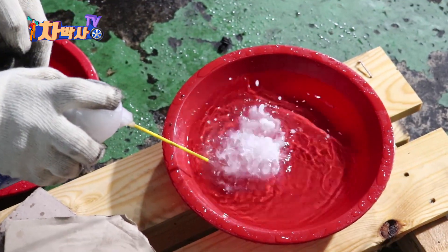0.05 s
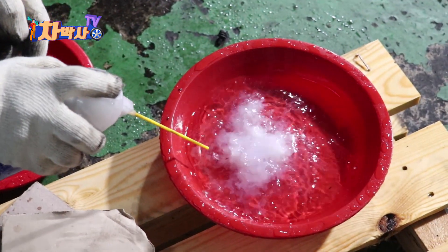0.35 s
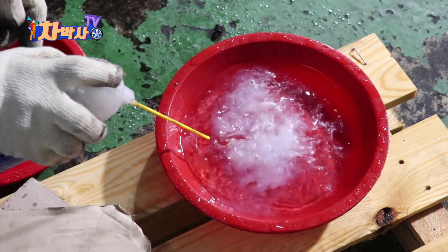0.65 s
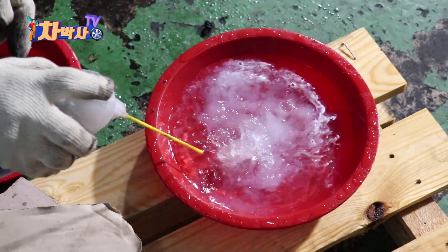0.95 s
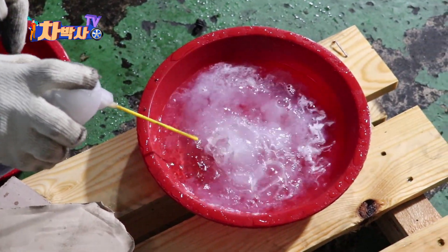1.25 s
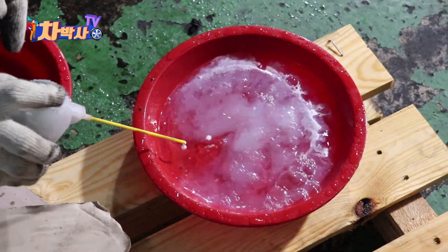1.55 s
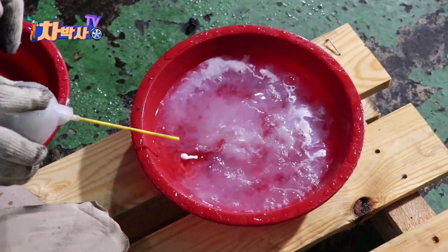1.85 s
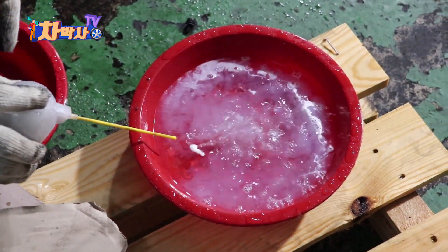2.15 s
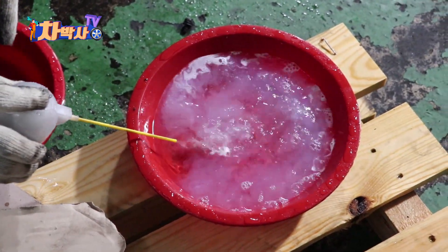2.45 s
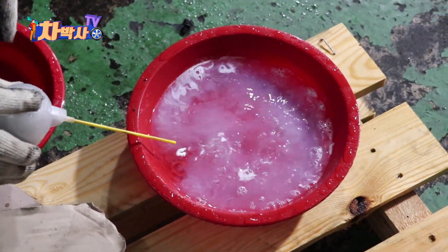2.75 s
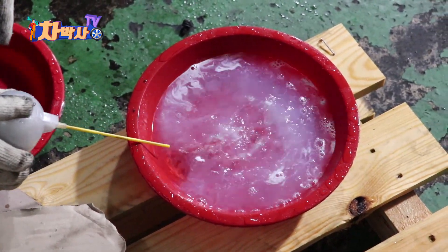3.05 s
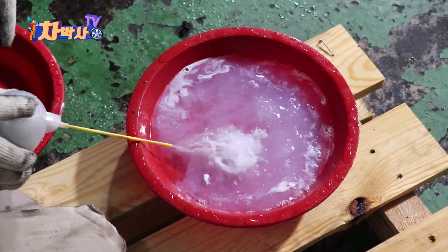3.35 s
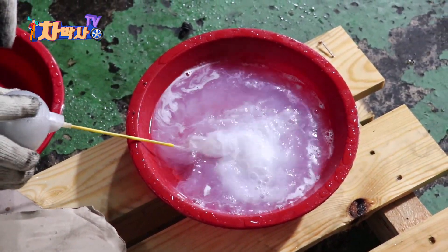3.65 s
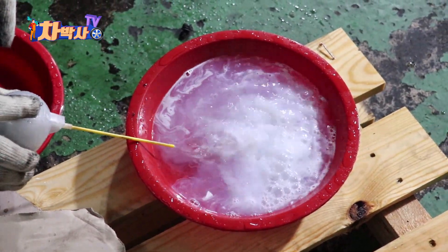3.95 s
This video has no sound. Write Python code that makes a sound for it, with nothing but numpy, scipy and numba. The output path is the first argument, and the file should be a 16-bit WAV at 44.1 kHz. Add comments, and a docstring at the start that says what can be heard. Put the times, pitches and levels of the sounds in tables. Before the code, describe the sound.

A jet of liquid and air hisses into a basin of water, foaming and gurgling, with wet spits and chirping drops thickest from 0.9 to 1.3 seconds. It fades near 1.5 seconds, then the nozzle sputters at 1.7 and the spray resumes. After another lull around 2.7 to 2.9, it fizzes on until 4 seconds, ending with deeper glugs. Distant machinery hums steadily outdoors.

```python
"""A jet of liquid and air, blown from a squeeze bottle through a thin tube, hisses into a plastic basin
of water outdoors. It foams and tears off small ringing bubbles; where it digs in, a pocket of air
gurgles at a pitch that follows its size, among wet spits and glugs. Drops chirp, the spray sizzles
and the nozzle sputters once. Distant machinery hums and rushes. One microphone with gain control."""
import sys
import numpy as np
from scipy import signal
from scipy.io import wavfile
from scipy.ndimage import uniform_filter1d
from numba import njit

SR = 44100
rng = np.random.default_rng(int(sys.argv[2]) if len(sys.argv) > 2 else 0)


def to_wav(s):
    """Save 16-bit WAV."""
    ch = np.atleast_2d(s).T  # columns
    pcm = np.round(np.clip(ch, -1, 1) * 32767)  # PCM
    wavfile.write(sys.argv[1], SR, pcm.astype(np.int16))


N = 176400

# Small bubbles torn off by the jet and by the air pockets.
SMALL_BUBBLES = dict(centre_hz=2690, spread_ratio=1.436, per_s=1300, ring_cycles=34)


def from_db(db):
    """Decibels to gain."""
    return 10 ** (np.asarray(db) / 20)


def rms_one(x):
    """Scale to unit rms."""
    return x / np.sqrt(np.mean(x ** 2) + 1e-20)


def in_time(rows):
    """Join timed rows by straight lines: one curve for each column after the time."""
    times, *columns = np.transpose(rows)
    return [np.interp(np.arange(N) / SR, times, column) for column in columns]


def drift(corner_hz):
    """A smooth random wander with rms about 1."""
    step, settle = 20, 4000
    pole = np.exp(-2 * np.pi * corner_hz * step / SR)
    white = rng.standard_normal(N // step + settle + 2)
    slow = signal.lfilter([1], [1, -2 * pole, pole * pole], white)[settle:]
    return np.interp(np.arange(N) / step, np.arange(len(slow)), rms_one(slow))


def banded_noise(spectrum):
    """Third-octave bands of noise shaped to a spectrum; rms 1."""
    edges = 22 * 2 ** (np.arange(30) / 3)
    white = rng.standard_normal((2, N))
    hz, db = np.transpose(spectrum)
    out = 0
    for k, (low, high) in enumerate(zip(edges, edges[1:])):
        band = signal.sosfilt(signal.butter(2, [low, high], "band", fs=SR, output="sos"), white[k % 2])
        out += band * from_db(np.interp(np.log(low * high) / 2, np.log(hz), db))
    return rms_one(out)


@njit
def glide(drive, hz, q):
    """A resonance with a moving centre; returns its complex swing."""
    out, swing = np.zeros(len(drive), np.complex128), 0j
    for i in range(len(drive)):
        w = 2 * np.pi * hz[i] / SR
        swing = swing * np.exp(-w / (2 * q) + 1j * w) + w * drive[i]
        out[i] = swing
    return out


def cavity(hz, q, even_s=0.023):
    """Turbulence rings an air cavity; the level is evened to rms 1."""
    swing = glide(rng.standard_normal(len(hz)), hz, float(q))
    power = uniform_filter1d(abs(swing) ** 2, int(even_s * SR))
    return swing.real / np.sqrt(power / 2 + 1e-12)


def burst(peak_s, db, hz, width_s, q, fall_octaves):
    """A resonance swells and dies in a bell curve, falling by fall_octaves every width_s."""
    age = (np.arange(N) / SR - peak_s) / width_s
    on, out = abs(age) < 4, np.zeros(N)
    ring = cavity(hz * 2 ** (-fall_octaves * age[on]), q)
    out[on] = from_db(db) * ring * np.exp(-age[on] ** 2 / 2)
    return out


def bubbles(centre_hz, spread_ratio, per_s, ring_cycles, pitches=20, spread_db=2.5):
    """Bubbles of random size, each ringing at its own pitch and fading 60 dB in ring_cycles; rms 1."""
    strength = from_db(spread_db * np.minimum(rng.exponential(1, N), 5)) * rng.choice([-1, 1], N)
    clicks = strength * (rng.random(N) < per_s / SR)
    pitch_index = rng.integers(0, pitches, N)
    out = 0
    for k, hz in enumerate(np.geomspace(centre_hz / spread_ratio, centre_hz * spread_ratio, pitches)):
        pole = np.exp(-np.log(1000) * hz / (ring_cycles * SR))
        resonator = [1, -2 * pole * np.cos(2 * np.pi * hz / SR), pole * pole]
        out += signal.lfilter([1, 0, -1], resonator, clicks * (pitch_index == k) + 1e-18)
    return rms_one(out)


def jet(top_hz=11500, tilt_db_per_db=0.2):
    """Hiss, foam fizz and small bubbles all grow with the flow; a strong jet is brighter."""
    # The strength of the jet. Each row: time in seconds, level in dB.
    flow = [(0, -27), (.16, -27.5), (.34, -37), (.56, -26.5), (.84, -29.5), (.95, -35), (1.0, -25),
            (1.23, -22), (1.33, -21), (1.4, -33.5), (1.435, -30), (1.49, -49), (1.74, -44), (1.8, -28),
            (2.04, -29.5), (2.09, -23.5), (2.14, -26.5), (2.28, -26.5), (2.52, -26.5), (2.66, -35),
            (2.69, -44), (2.91, -47), (2.93, -32), (3.01, -25.5), (3.19, -27.5), (3.22, -34.5),
            (3.36, -26.5), (3.84, -26.5), (4.0, -23)]
    # The colour of the hiss. Each row: frequency in Hz, relative noise density in dB.
    hiss_spectrum = [(900, -25), (2000, -16), (4000, 5.5), (6500, 0), (8500, 0.5), (11000, 3.5),
                     (13000, 3.1), (16000, -1.6)]
    # How much the jet foams. Each row: time in seconds, fizz level in dB relative to the flow.
    foam = [(0, -8.5), (1.1, -1.5), (1.9, -8.5), (2.15, -1), (2.9, -3), (3.6, -0.5), (4, -2)]
    flow_db, = in_time(flow)
    flutter = from_db(1.5 * drift(corner_hz=36))
    air = banded_noise(hiss_spectrum)
    top = signal.sosfiltfilt(signal.butter(2, top_hz, "high", fs=SR, output="sos"), air)
    top_gain = from_db(tilt_db_per_db * (flow_db - np.median(flow_db)))
    hiss = from_db(-0.46) * (air + top * (top_gain - 1))
    foam_db, = in_time(foam)
    fizz = from_db(foam_db) * bubbles(centre_hz=5400, spread_ratio=1.085, per_s=1700, ring_cycles=62)
    bubbling = from_db(-4.5) * bubbles(**SMALL_BUBBLES)
    return flutter * from_db(flow_db) * (hiss + fizz + bubbling)


def gulps(scatter_octaves, typical_per_s=90, fall_octaves=.15, spread_db=2.5, count=1000):
    """An uneven chain of short swells, each falling in pitch; returns pitch ratio and gain."""
    gap, pitch, level = rng.standard_normal((count, 3)).T
    starts = np.cumsum(np.exp(gap / 2)) / typical_per_s
    place = np.interp(np.arange(N) / SR, starts - starts[0], np.arange(count))
    k, age = place.astype(int), place % 1
    swell = np.sqrt(np.sin(np.pi * age)) * from_db(spread_db * np.clip(level[k], -2, 2))
    bend = 2 ** (scatter_octaves * pitch[k] - fall_octaves * (age - .5))
    return bend, rms_one(swell)


def droplets(hz=3796):
    """Droplets over the gurgles: three overlapping chains of tiny falling chirps; rms 1."""
    chains = [gulps(scatter_octaves=0.272, typical_per_s=115, fall_octaves=0.3, spread_db=6.5)
              for _ in range(3)]
    return rms_one(sum(swell * cavity(hz * bend, q=54) for bend, swell in chains))


def gurgles(pocket_q=16, side_db=-6):
    """Each air pocket rings as it refills in gulps, and sheds side pockets, droplets and bubbles."""
    # Air pockets under the jet. Each entry: pitch scatter in octaves, then the pocket's path.
    # Each row of a path: time in seconds, resonance in Hz, level in dB.
    pockets = [ (0.11, [(0, 1370, -20.5), (.082, 1415, -18.5), (.115, 1570, -19.5), (.135, 1390, -20),
               (.2, 1380, -25.5)]), (.05, [(.505, 3530, -40), (.525, 2860, -22), (.55, 2400, -24),
               (.585, 2620, -28), (.612, 1860, -18), (.635, 1900, -26)]), (0.37, [(.635, 2320, -22.5),
               (.69, 2120, -22), (.78, 2730, -22), (.83, 2520, -25.5)]), (0.11, [(.83, 2330, -21),
               (.85, 2220, -20.5), (.88, 2040, -20), (.935, 2040, -17.5), (.95, 1660, -16.5),
               (.99, 1480, -20), (1.005, 1280, -15), (1.04, 1890, -16), (1.09, 1750, -22.5),
               (1.13, 1340, -20.5), (1.21, 1680, -17), (1.25, 1400, -30)]), (.03, [(1.265, 945, -26.5),
               (1.3, 707, -21.5), (1.325, 866, -17), (1.35, 930, -23.5), (1.375, 1140, -19.5),
               (1.42, 1220, -27)]), (.03, [(2.11, 3000, -22), (2.143, 2160, -17), (2.172, 2380, -20),
               (2.195, 1950, -19), (2.225, 2080, -30)]), (.05, [(2.23, 3500, -27), (2.25, 3250, -20),
               (2.29, 3200, -27), (2.36, 3300, -30), (2.38, 3250, -21.5), (2.455, 3030, -22.5),
               (2.49, 2370, -24.5), (2.52, 2620, -39)]), (0.1, [(2.955, 3900, -43), (2.98, 2990, -18.5),
               (3.0, 2900, -37), (3.035, 3120, -20.5), (3.07, 3550, -34.5), (3.165, 3300, -27),
               (3.22, 3440, -32)]), (0.056, [(3.62, 1320, -32), (3.655, 1220, -25), (3.72, 900, -28.5),
               (3.76, 742, -23.5), (3.825, 905, -24), (3.845, 950, -40)]), (0.11, [(3.85, 1600, -28),
               (3.875, 1160, -22), (3.91, 1740, -23), (3.93, 1390, -29), (3.948, 1420, -17),
               (3.962, 1700, -31), (3.98, 2220, -17.5), (4.0, 2050, -16)])]
    t, out = np.arange(N) / SR, np.zeros(N)
    side_bend, side_swell = gulps(scatter_octaves=.28)
    splash = from_db(-8.5) * droplets() + from_db(-10.5) * bubbles(**SMALL_BUBBLES)
    for scatter_octaves, path in pockets:
        on = (t >= path[0][0]) & (t <= path[-1][0])
        hz, db = in_time(path)
        bend, swell = gulps(scatter_octaves)
        main = swell[on] * cavity((hz * bend)[on], pocket_q)
        side = from_db(side_db) * side_swell[on] * cavity((hz * side_bend)[on], pocket_q)
        out[on] += from_db(db[on]) * (main + side + splash[on])
    return out


def machinery(rush_db=-24.5, drone_hz=72.8, waver_hz=0.5, waver_db=1.0):
    """Distant machinery: a steady rush with wavering hum tones and a low, swelling drone."""
    # The colour of the rush. Each row: frequency in Hz, relative noise density in dB.
    rush_spectrum = [(25, -8.5), (60, -7.5), (110, -10.5), (190, -8), (290, -4), (500, -4), (700, -4),
                     (850, 2), (1020, -3.5), (1250, 0.5), (1800, -6), (3600, -6), (4600, -18),
                     (5600, -11.5), (7500, -27.5), (10000, -32), (15500, -48)]
    # The tones of the hum. Each row: pitch in Hz, level in dB.
    hum_tones = [(145, -46), (240, -36), (298, -44.5), (360.6, -50), (435.2, -37), (581, -47)]
    # The swell of the drone. Each row: time in seconds, level in dB.
    drone_swell = [(0, -45), (1.5, -47.5), (2.4, -38.5), (3.0, -48.5), (3.45, -35.5), (4, -40.5)]
    drone_db, = in_time(drone_swell)
    out = from_db(rush_db) * banded_noise(rush_spectrum)
    for hz, db in [*hum_tones, (drone_hz, drone_db)]:
        turns = rng.random() + np.cumsum(hz + waver_hz * drift(corner_hz=3.2)) / SR
        gain = from_db(db + waver_db * drift(corner_hz=15))
        out += gain * np.sqrt(2) * np.sin(2 * np.pi * turns)
    return out


def spits(lift_db=2.5):
    """Short wet spits and glugs, each a broad resonance that falls in pitch."""
    # The spits and glugs. Each row: peak time in seconds, level in dB before the lift, pitch in Hz,
    # width in seconds.
    wet_bursts = [(0.079, -20, 3300, 0.005), (0.136, -19, 3300, 0.0086), (0.522, -20.5, 2750, 0.0083),
                  (0.565, -25.5, 5800, 0.0047), (0.591, -19.5, 2550, .005), (.609, -17.5, 1930, .008),
                  (0.733, -16, 3900, 0.0024), (0.797, -19, 2710, 0.0015), (0.943, -7.5, 1890, 0.002),
                  (0.944, -28, 5170, 0.0016), (1.236, -18, 5300, 0.012), (1.335, -17.5, 3200, 0.003),
                  (1.381, -24.5, 5400, 0.0077), (2.094, -26, 5400, .008), (2.113, -15, 2850, 0.0024),
                  (2.539, -16.5, 2900, 0.0082), (3.347, -20.5, 2800, 0.0014), (3.731, -22, 2280, 0.0062),
                  (3.904, -18.5, 2420, .003)]
    return sum(burst(peak_s, db + lift_db, hz, width_s, q=9, fall_octaves=.14)
               for peak_s, db, hz, width_s in wet_bursts)


def drops():
    """Single loud drops, each a wet chirp that slides quickly down."""
    # The drops. Each row: peak time in seconds, pitch in Hz, level in dB.
    plinks = [(.888, 3540, -28), (.911, 3450, -24), (1.068, 4100, -19), (1.146, 3560, -17),
              (1.166, 3900, -14.5), (1.194, 5700, -21), (1.198, 3520, -10.5), (1.338, 2130, -15),
              (2.279, 5200, -20), (2.421, 3140, -14), (3.437, 3480, -17.5), (3.954, 3400, -13.5),
              (3.978, 5250, -15)]
    return sum(burst(peak_s, db, hz, width_s=.005, q=13, fall_octaves=.12) for peak_s, hz, db in plinks)


def sizzles():
    """The spray sings for a moment in one high band."""
    # Resonances of the spray. Each row: peak time in seconds, level in dB, pitch in Hz,
    # width in seconds, Q.
    spray_rings = [(1.234, -18, 14000, .014, 6), (1.298, -21.5, 7640, .016, 9.4),
                   (2.268, -30, 11000, .04, 22), (3.34, -29.5, 14000, .07, 10), (3.6, -40, 12050, .07, 24),
                   (3.929, -30, 14000, .05, 8)]
    return sum(burst(*ring, fall_octaves=0) for ring in spray_rings)


def sputter(band_hz=(6500, 13000)):
    """The nozzle lets out a bright puff of air as the jet restarts."""
    # The puff. Each row: start in seconds, level in dB, decay time in seconds.
    puffs = [(1.733, -21, 0.0023)]
    t = np.arange(N) / SR
    band = signal.butter(2, band_hz, "band", fs=SR, output="sos")
    air = rms_one(signal.sosfilt(band, rng.standard_normal(N)))
    return air * sum(from_db(db) * (t >= start) * np.exp(-abs(t - start) / decay)
                     for start, db, decay in puffs)


def basin(direct, dull_hz=5600):
    """The direct sound and two close, slightly dull reflections."""
    # Bounces off the basin wall and the ground. Each row: delay in seconds, level in dB.
    echoes = [(.0047, -19.5), (.0083, -13.5)]
    dull = signal.sosfilt(signal.butter(1, dull_hz, fs=SR, output="sos"), direct)
    return direct + sum(from_db(db) * np.pad(dull, (int(delay * SR), 0))[:N] for delay, db in echoes)


def scene():
    """The water in its basin with the machinery behind it, the same in both channels."""
    water = jet() + sizzles() + gurgles() + spits() + drops() + sputter()
    return np.tile(basin(water) + machinery(), (2, 1))


def record(dry):
    """Gain control ducks the loud bursts and recovers slowly; the top is cut."""
    threshold_db, duck_db_per_db, release_db_per_s, makeup_db = -16.5, 0.85, 30.5, 0.63
    sense_s, cutoff_hz = 0.025, 15800
    window = int(sense_s * SR)
    level_db = 10 * np.log10(np.maximum(uniform_filter1d(dry[0] ** 2, window), 1e-12))
    over_db = np.maximum(level_db - threshold_db, 0)
    release = release_db_per_s * np.arange(N) / SR
    held_db = np.maximum.accumulate(over_db + release) - release  # each peak ebbs at the release rate
    ducked = dry * from_db(makeup_db - duck_db_per_db * uniform_filter1d(held_db, window))
    return signal.sosfilt(signal.ellip(12, .1, 90, cutoff_hz, fs=SR, output="sos"), ducked)


dry = scene()
out = record(dry)
to_wav(out)
```